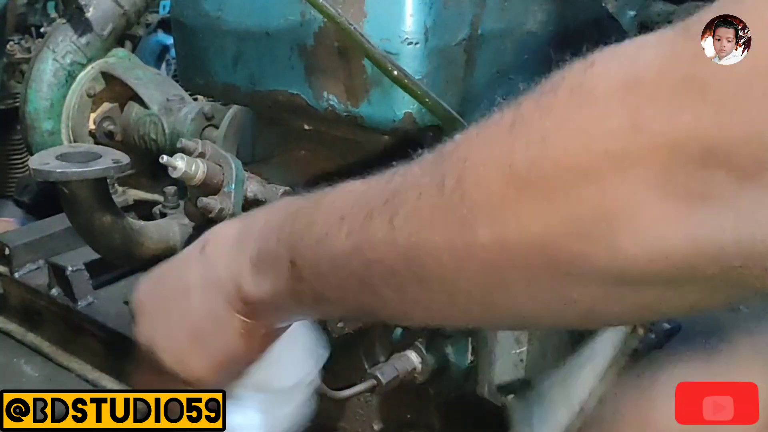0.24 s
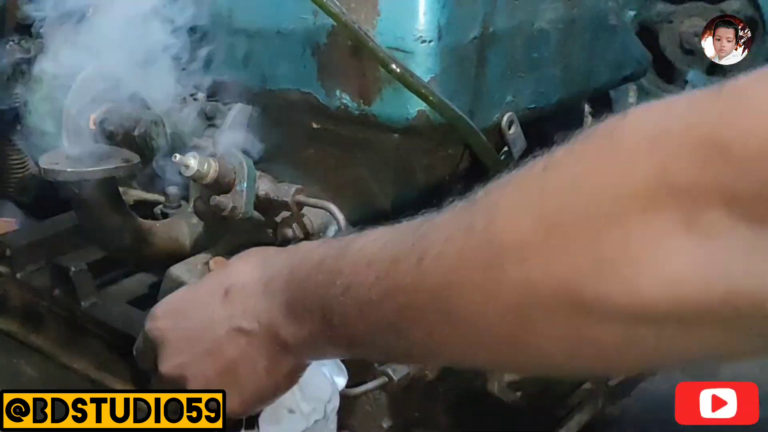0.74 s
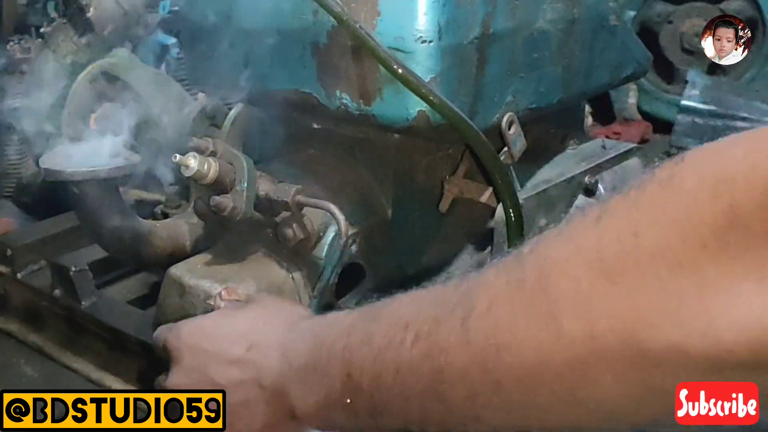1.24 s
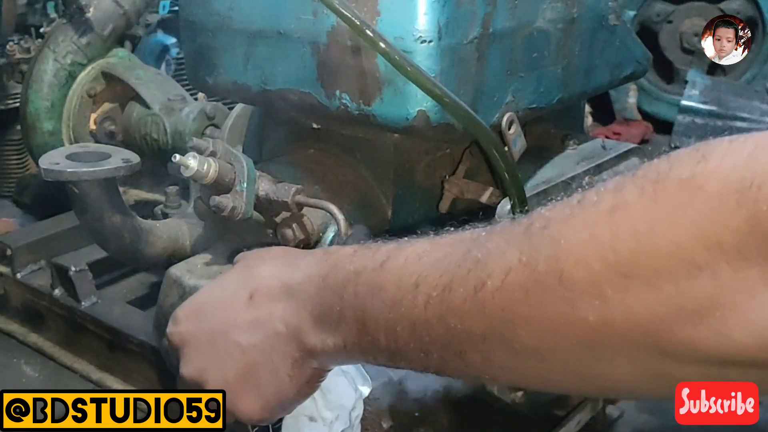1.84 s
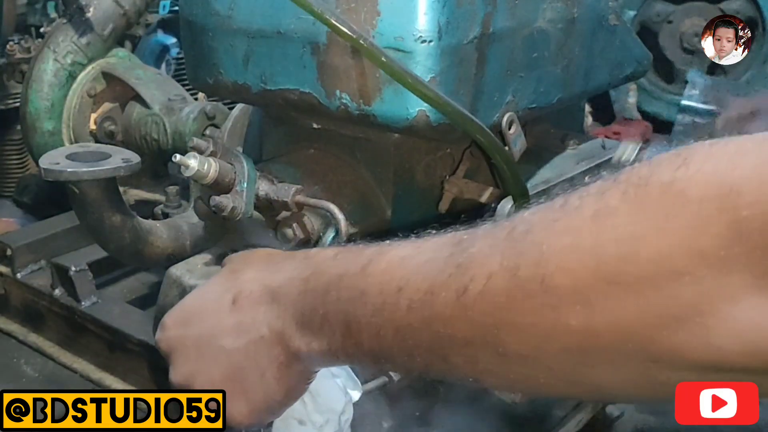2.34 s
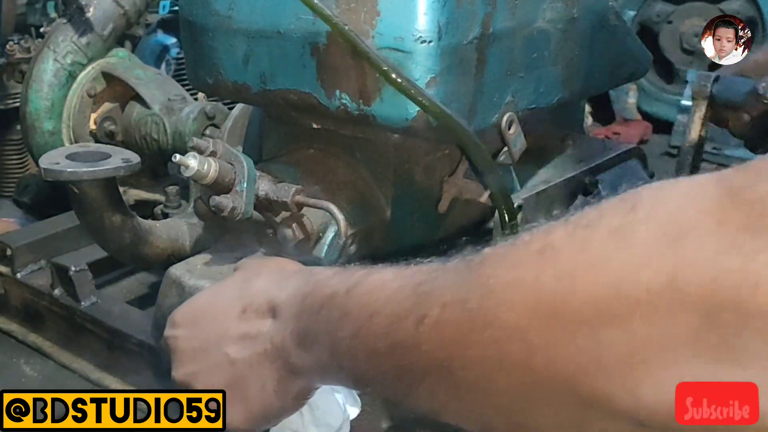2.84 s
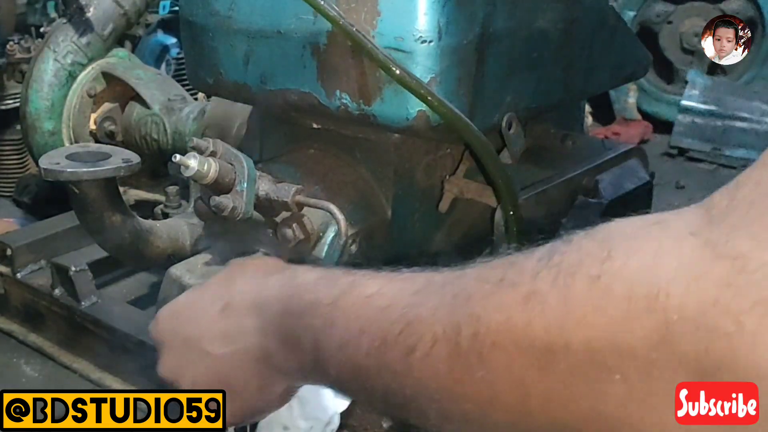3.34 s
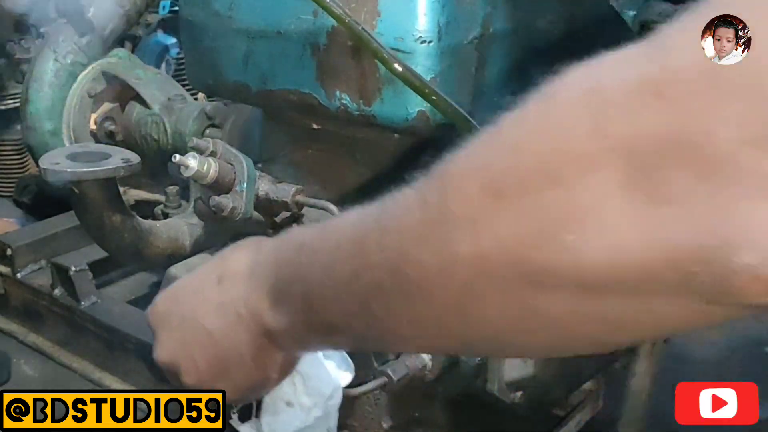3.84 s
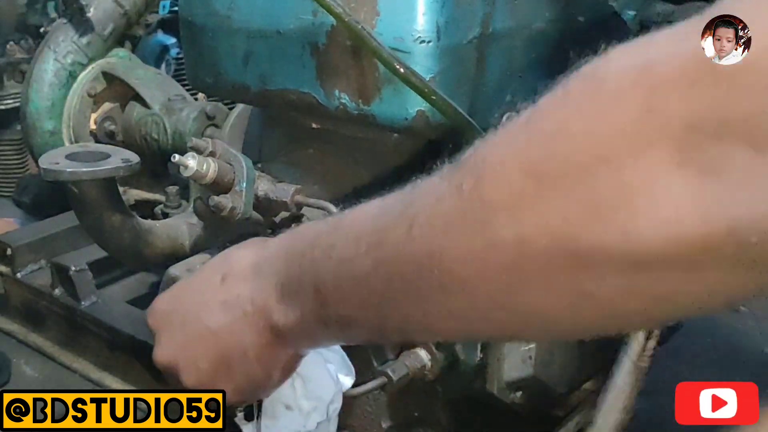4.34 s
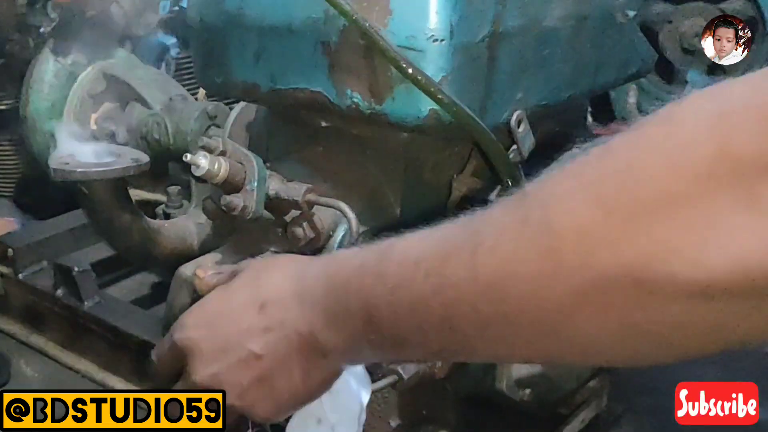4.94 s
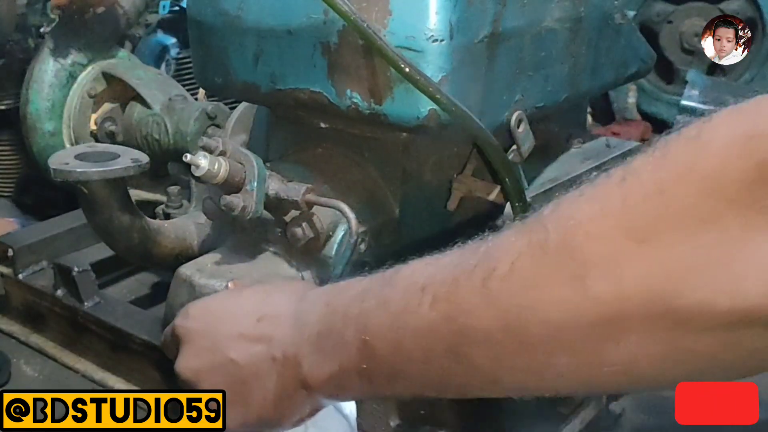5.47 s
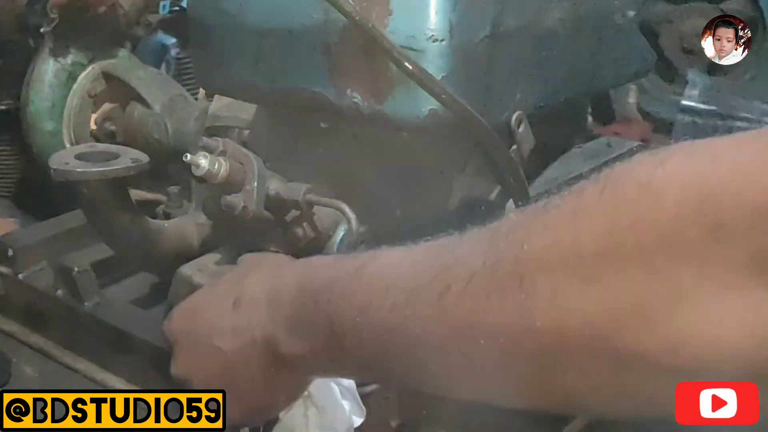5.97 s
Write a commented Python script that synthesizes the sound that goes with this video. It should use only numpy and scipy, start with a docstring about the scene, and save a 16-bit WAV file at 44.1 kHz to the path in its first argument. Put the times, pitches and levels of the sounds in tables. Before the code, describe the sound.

A small single-cylinder diesel is cranked over, clattering metal and a few deep exhaust thuds, slowing to loose clacks, then a second burst of attempts.

```python
"""Small diesel failing to start

A small single-cylinder diesel is turned over in a workshop and fires unevenly without catching.
Its metal parts are struck: noise bursts and ringing partials shaped by the resonances of each part.
Gears churn as filtered noise that swells and sinks; firings are steep pressure pulses with turbulence.
The exhaust pipe booms on at a gliding low pitch, the casing throbs, and a room response adds reflections."""
import sys
import numpy as np
from scipy import signal
from scipy.fft import rfft, irfft, next_fast_len
from scipy.io import wavfile
from scipy.ndimage import uniform_filter1d, minimum_filter1d

SR = 44100
rng = np.random.default_rng(int(sys.argv[2]) if len(sys.argv) > 2 else 0)


def to_wav(s):
    """Save 16-bit WAV."""
    ch = np.atleast_2d(s).T  # columns
    pcm = np.round(np.clip(ch, -1, 1) * 32767)  # PCM
    wavfile.write(sys.argv[1], SR, pcm.astype(np.int16))


N = 273861
PADDED = next_fast_len(N + SR // 2, True)
TIME, FREQS = np.arange(N) / SR, np.fft.rfftfreq(PADDED, 1 / SR)
CONTACT_S = .0026  # time in which a blow builds up
LEFT_RIGHT = np.array([[1], [-1]])


def from_db(db):
    """Decibel law: level to amplitude gain."""
    return 10 ** (np.asarray(db) / 20)


def rms_one(x):
    """Power normalisation: scale to unit mean square."""
    return x / np.sqrt(np.mean(x ** 2) + 1e-20)


def in_time(rows):
    """Linear interpolation: each column of a curve at every sample."""
    s, *columns = np.transpose(rows)
    return [np.interp(TIME, s, column) for column in columns]


def at_hz(points, hz):
    """Interpolation on a logarithmic frequency axis."""
    point_hz, values = np.array(points).T
    return np.interp(np.log(hz + 1), np.log(point_hz), values)


def drift(rate):
    """Band-limited chance: random knots, rate per second, joined by lines; rms 1."""
    knots = rng.standard_normal(N // 8)
    return rms_one(np.interp(TIME * rate, np.arange(len(knots)), knots))


def band(low_hz, high_hz, order=10):
    """Butterworth magnitude law: gain of a band-pass."""
    low_cut = 1 + (low_hz / (FREQS + 1)) ** (2 * order)
    high_cut = 1 + (FREQS / high_hz) ** (2 * order)
    return (low_cut * high_cut) ** -.5


# likeness of left and right, taken as at most 1: frequency_hz, correlation
LIKENESS = [(120, 0.54), (250, 1.9), (500, 0.63), (1000, 0.09), (2000, -0.09), (8000, 0.05)]
# balance of left against right: frequency_hz, left_over_right_db
BALANCE = [(150, 1), (350, 5), (700, 0.5), (1400, 1.5), (2500, 6), (4000, 1.5), (6000, -4), (9000, -10.5),
           (13000, -9.5)]


def contacts(colour, grit_db):
    """Random excitation: dense stereo noise of uneven strength and given spectrum; rms 1."""
    sizes = from_db(grit_db * np.clip(drift(900), -2, 2))
    mid, side = rfft(rng.standard_normal((2, N)) * sizes, PADDED)
    alike = np.clip(at_hz(LIKENESS, FREQS), -1, 1)
    pair = np.sqrt(1 + alike) * mid + np.sqrt(1 - alike) * side * LEFT_RIGHT
    pair = pair * from_db(LEFT_RIGHT * at_hz(BALANCE, FREQS) / 2)
    return rms_one(irfft(pair * colour, PADDED)[:, :N])


def resonance(modes, ring_db):
    """Modal superposition: power of the direct shock plus that of a part's resonances."""
    ring = sum(from_db(db) ** 2 / (1 + (2 * (FREQS - hz) / width) ** 2) for hz, width, db in modes)
    return np.sqrt(1 + from_db(ring_db) ** 2 * ring)


# ring of the iron casing: pitch_hz, width_hz, relative_db
CASING = [(319, 16.3, -1), (417.7, 25.5, -1.5), (527.5, 44.8, -1.5), (751, 35, 2), (854, 20, 0),
          (1087.6, 42.75, 2.5), (1368, 76.5, -1), (1840, 43.4, -3), (2154, 41, -1.5), (2489, 69, -1.5),
          (2757, 42, -3), (3186, 196, -2.5), (3486, 85, -1), (3792, 53, 0.5), (4110, 170, -1.5),
          (4790, 54, -4), (5190, 23.6, -4), (5750, 69, -3), (6350, 27, -6.5)]


def casing_response():
    """Structural resonance: the casing's modes stand above its direct shock."""
    return resonance(CASING, ring_db=8.0)


def grinding(colour, spacing_hz, shift_db, grit_db, count=3):
    """Moving contact: interleaved sets of resonances swell and fade independently; rms 1."""
    total = 0
    for k in range(count):
        part = np.maximum(np.cos(2 * np.pi * (FREQS / spacing_hz + k / count)), 0) ** .5
        total = total + contacts(colour * part, grit_db) * from_db(shift_db * drift(45))
    return rms_one(total)


def tooth_ticks(per_s, size_db, t60, count=30):
    """Impulse response: teeth catch at random and each tick rings at a few pitches; stereo, rms 1."""
    at = np.flatnonzero(rng.random(N) < per_s / SR)
    sizes = from_db(size_db * np.minimum(rng.exponential(1, len(at)), 2))
    out = np.zeros((2, N))
    for hz in np.geomspace(600, 5000, count):
        clicks = np.zeros((2, N))
        chosen = rng.random(len(at)) < 1 / 6
        clicks[:, at] = sizes * chosen * rng.standard_normal((2, len(at)))
        # two-pole resonator: pole radius and angle
        r, w = from_db(-60 / (t60 * SR)), 2 * np.pi * hz / SR
        poles = [1, -2 * r * np.cos(w), r * r]
        out += signal.lfilter([np.sin(w), 0, -np.sin(w)], poles, clicks + 1e-18) / w
    return rms_one(out)


# churn of gears and bearings, before the trims in churn(): time_s, low_db, high_db
CHURN = [(0.0, -33.5, -25.5), (0.17, -33, -28), (0.43, -41.5, -34.5), (0.6, -34.5, -39.5),
         (0.72, -43.5, -40), (1.07, -37.5, -49), (1.35, -46, -44.5), (1.56, -41.5, -50),
         (1.85, -45.5, -58.5), (2.3, -46.5, -51.5), (2.65, -48, -63), (3.18, -53, -57), (3.46, -38, -43),
         (3.74, -30, -30.5), (3.87, -37, -39), (3.96, -33, -30.5), (4.19, -31, -32), (4.53, -32, -26),
         (4.72, -41.5, -39.5), (4.98, -44, -48.5), (5.21, -42, -61), (5.48, -40, -46), (6.02, -46, -45.5),
         (6.21, -34, -45)]
# spectrum of the low grind: frequency_hz, relative_db
GEAR_LOW = [(140, 28), (200, 1), (320, 0), (480, 4.5), (600, -14.5), (780, -3), (930, -16.5), (1150, 6.5),
            (1400, -11)]
# spectrum of the high scrape: frequency_hz, relative_db
GEAR_HIGH = [(1400, 7), (2300, 5), (3100, -7.5), (5000, -1.5), (6500, -14), (8200, -37), (10500, -27),
             (15000, -52)]


def churn(iron, low_db, high_db, mesh_db, ticks_db):
    """Friction and meshing: gears grind unevenly and their teeth tick against the casing."""
    low, high = in_time(CHURN)
    low_colour = iron * from_db(at_hz(GEAR_LOW, FREQS)) * band(162.6, 1060)
    high_colour = iron * from_db(at_hz(GEAR_HIGH, FREQS)) * band(1200, 15500)
    grind = grinding(low_colour, spacing_hz=373.8, shift_db=3.5, grit_db=-1.0)
    scrape = grinding(high_colour, spacing_hz=837.0, shift_db=3.5, grit_db=1.5)
    tick_spectrum = rfft(tooth_ticks(per_s=220, size_db=5.5, t60=0.036), PADDED)
    ticks = rms_one(irfft(tick_spectrum * iron * band(700, 2600, order=1), PADDED)[:, :N])
    mesh = rms_one(from_db(mesh_db * drift(140)))
    rubbing = (from_db(low + low_db) * grind + from_db(high + high_db) * scrape) * mesh
    return rubbing + from_db(high + ticks_db) * ticks


# pace of the steady throb: crest_s, throbs_since_start
THROB_CRESTS = [(-.05, 0), (1.09, 16), (1.461, 21), (2.129, 30), (2.969, 42), (3.428, 48), (5.155, 70),
                (5.541, 75), (5.806, 78), (6.23, 83)]
# casing's two lowest resonances, before the swell: time_s, lower_db, lower_pitch_hz, upper_db
THROB = [(0, -28, 125, -47), (1.2, -37, 128.4, -49), (1.9, -35, 131.3, -45.5), (2.5, -40.5, 134, -41.5),
         (2.9, -42, 130.6, -56), (3.2, -37.5, 129.3, -51), (5.24, -34, 127, -56), (6.21, -32.5, 128, -47)]
# hard strokes of the piston, before the trim heave_db: peak_s, level_db
HEAVES = [(0.02, -23.5), (0.479, -20), (0.595, -27), (0.703, -36), (0.968, -23.5), (3.891, -23),
          (4.047, -19), (4.172, -20.5), (4.265, -23), (4.385, -25), (4.521, -24), (4.627, -27),
          (4.77, -22.5)]


def throbs(upper_hz, width_s, heave_db, scatter, uneven_db, sharpness):
    """Forced vibration: two casing resonances swell and sink; the lower also heaves on hard strokes."""
    turns, = in_time(THROB_CRESTS)
    lower_db, lower_hz, upper_db = in_time(THROB)
    swell = from_db(uneven_db * drift(19)) * np.abs(np.cos(np.pi * turns)) ** sharpness
    heave_power = np.zeros(N)
    for s, peak_db in HEAVES:
        hump = np.maximum(1 - ((TIME - s) / width_s) ** 2, 0) ** 2
        heave_power += (from_db(peak_db + heave_db) * hump) ** 2

    def tone(hz):
        """Frequency modulation: a sine of rms 1 whose pitch wanders."""
        return np.sqrt(2) * np.sin(2 * np.pi * np.cumsum(hz * (1 + scatter * drift(25))) / SR)

    lower_level = np.sqrt((from_db(lower_db) * swell) ** 2 + heave_power)
    return lower_level * tone(lower_hz) + from_db(upper_db) * swell * tone(upper_hz)


# pumping of the pipe by the piston, before heat and the trim pumped_db: time_s, pitch_hz, level_db
BOOM = [(0, 80, -35), (.2, 88.4, -29.5), (.35, 90.4, -40.5), (.6, 70.3, -30.5), (.92, 73.1, -31.5),
        (1.1, 65.2, -57), (1.9, 57.9, -46), (2.3, 62, -54.5), (3.55, 60.4, -52.5), (3.9, 66.2, -38),
        (4.15, 66.3, -34), (4.4, 95.4, -31.5), (4.6, 92, -33), (4.82, 80, -31), (4.98, 72.1, -32),
        (5.1, 56.5, -29), (5.3, 59.9, -34), (5.8, 59.3, -43.5), (6.21, 73.6, -37.5)]
# exhaust puffs and the gas rushing from the pipe mouth: start_s, peak_db, pitch_hz, chuff_db
FIRINGS = [(0.4043, -6, 106, -23.5), (0.417, -15.5, 141, -35), (0.6374, -4, 110, -23),
           (0.674, -8.5, 130, -41), (0.722, -23, 190, -30.5), (0.874, -5.5, 112, -41),
           (0.906, -8.5, 133, -28), (1.3428, -15, 185, -31), (4.7309, -2, 112, -22.5),
           (4.742, -12, 151, -34), (4.76, -14, 110, -52), (5.028, -3.5, 122, -30.5),
           (5.113, -13, 157.1, -49)]
# a puff of FULL_PUFF_DB or more sets the pipe booming fully; the boom then dies away
FULL_PUFF_DB, BOOM_FALL_DB_PER_S = -5, 41
# hot gas raises the pitch by up to this share after a firing, and cools with this time constant
HOT_LIFT, COOLING_S = 0.357, 0.0502


def boom(fired_db, growth, pumped_db, waver, unrest):
    """Pipe resonance: gas swings as the piston pumps it and after firings, sinking in pitch as it cools."""
    hz, pumping_db = in_time(BOOM)
    level, heat = from_db(pumped_db + pumping_db), np.zeros(N)
    for s, db, *_ in FIRINGS:
        age = np.maximum(TIME - s, 0)
        kick_db = fired_db + growth * min(db - FULL_PUFF_DB, 0)
        fired_level = np.minimum(age * hz, 1) * from_db(kick_db - BOOM_FALL_DB_PER_S * age)
        level = np.maximum(level, fired_level)
        heat = np.maximum(heat, (age > 0) * from_db(kick_db - fired_db) * np.exp(-age / COOLING_S))
    phase = 2 * np.pi * np.cumsum(hz * (1 + HOT_LIFT * heat + waver * drift(45))) / SR
    # eddies unsettle a gentle swing more than a strong one
    eddies = unrest / (1 + level / from_db(-22))
    swing = (1 + eddies * drift(50)) * np.sin(phase) + eddies * drift(50) * np.cos(phase)
    return level * swing / np.sqrt(.5 + eddies ** 2)


# spectrum of the steady background: frequency_hz, relative_db
HISS = [(200, -3.5), (330, -8), (485, 1), (570, -6), (700, -6), (880, -10), (980, -9.5), (1150, -16.5),
        (2100, -7.5), (3000, -12.5), (4800, -16.5), (6400, -28), (8200, -52), (11000, -46.5), (15000, -51)]


def hiss(db, waver_db):
    """Broadband noise: the workshop's background wavers slightly."""
    colour = from_db(at_hz(HISS, FREQS)) * band(110, 16000, order=4)
    level = from_db(db + waver_db * drift(8))
    return level * grinding(colour, spacing_hz=528, shift_db=1.8, grit_db=1.5)


def rebounds(per_s, t60):
    """Repeated impact: level of a loose part that touches again at uneven moments; rms 1."""
    touches = (rng.random(N) < per_s / SR) * rng.random(N) * 2
    # power falls by 60 dB in t60
    power = signal.lfilter([1], [1, -from_db(-120 / (t60 * SR))], touches)
    return rms_one(np.sqrt(.3 + power))


def partials(share_below, age, count):
    """Modal excitation: a blow picks its own partials, most often where the part rings best; stereo."""
    places = .96 * (np.arange(count) + rng.random(count)) / count
    hz = np.interp(places, share_below, FREQS)
    gains = from_db(LEFT_RIGHT * at_hz(BALANCE, hz) / 2 + rng.normal(0, 3, count))
    gains = gains / np.sqrt(np.sum(gains ** 2) / 4)
    gains = gains * np.exp(2j * np.pi * rng.random((2, count)))
    turns = 2 * np.pi * hz[:, None] * age
    return gains.real @ np.cos(turns) + gains.imag @ np.sin(turns)


# tilt of the four knock bands with contact hardness: change_db per dB of brightness
HARDNESS = [-0.44, 0.42, 1.39, 2]
# blows above this level die sooner; their decay time halves over this many dB
FIRM_BLOW_DB, DECAY_HALVING_DB = -23, 16


def blows(rows, spectrum_db, t60, pan_db):
    """Contact hardness: brightness tilts a part's spectrum, and firm blows decay faster than light ones."""
    hits = []
    for s, rattle, db, bright in rows:
        blow_t60 = t60 * .5 ** (max(db - FIRM_BLOW_DB, 0) / DECAY_HALVING_DB)
        levels = db + np.array(spectrum_db) + bright * np.array(HARDNESS)
        hits.append((s, max(rattle, 0), blow_t60, *levels, pan_db))
    return hits


# bands of clunk, clank, clink and tick: low_hz, high_hz
KNOCK_BANDS = [(250, 1400), (1400, 3200), (3200, 7300), (9200, 15500)]
# spectrum of a metal contact: frequency_hz, relative_db
CONTACT = [(250, -1.5), (420, -4), (600, -4.5), (780, -1.5), (930, -6), (1150, -1.5), (1600, 0),
           (2300, 2.5), (3000, -3), (5000, 0.5), (6300, -7), (7500, -18.5), (10000, -24), (13000, -24.5),
           (16000, -28)]
# a blow lands cleanly and its chatter sets in within this time
SETTLE_S = .014


def knocks(hits, part, band_db, ring_db, crack_db, crack_s, chatter_db, clash_share, ring_t60, count):
    """Impact and free decay: a crack and chattering clash die quickly and leave ringing partials."""
    body = part * from_db(at_hz(CONTACT, FREQS))
    colours = [body * band(*edges, order=14) for edges in KNOCK_BANDS]
    shares = [np.cumsum(c ** 2) / np.sum(c ** 2) for c in colours]
    power, rings = np.zeros((len(colours), 2, N)), np.zeros((2, N))
    chatter = rms_one(from_db(chatter_db * drift(300)) * rebounds(per_s=230, t60=0.1))
    for s, rattle, t60, *levels, pan in hits:
        span = slice(max(0, int((s - CONTACT_S) * SR)), int((s + .2) * SR))
        age = TIME[span] - s
        rise = np.clip(age / CONTACT_S + .5, 0, 1)
        since = np.maximum(age - rattle, 0)  # decay begins when the rattle ends
        gains = from_db(levels)[:, None, None] * from_db(LEFT_RIGHT * pan / 2)
        clash = rise * from_db(-60 * since / (t60 * clash_share))
        clash = clash * (1 + (chatter[span] - 1) * np.clip(age / SETTLE_S, 0, 1) ** 2)
        crack = 1 + from_db(crack_db) * np.exp(-np.abs(age) / crack_s)
        power[:, :, span] += (gains * clash * crack) ** 2
        for k, share_below in enumerate(shares):
            ring = rise * from_db(-60 * since / np.hypot(t60, ring_t60[k]) + ring_db[k])
            rings[:, span] += gains[k] * ring * partials(share_below, age, count=count)
    clashes = 0
    for band_power, colour, db in zip(power, colours, band_db):
        clashes = clashes + from_db(db) * np.sqrt(band_power) * contacts(colour, grit_db=1.0)
    return rings + clashes


def ringing(strikes, modes, width_hz):
    """Damped modes: each strike rings; random phase broadens the modes and makes the tail ragged."""
    out = np.zeros((2, N))
    for s, db in strikes:
        span = slice(int(s * SR), int((s + .4) * SR))
        age = np.maximum(TIME[span] - s, 0)
        for hz, mode_db, t60 in modes:
            steps = rng.standard_normal((2, 2, len(age)))
            wander = np.cumsum(steps, axis=-1) * np.sqrt(2 * np.pi * abs(width_hz) / SR)
            start = rng.random((2, 2, 1))
            pair = np.sin(2 * np.pi * (hz * age + start) + wander).sum(axis=1)
            level = from_db(db + mode_db - 60 * age / t60) * np.minimum(age / CONTACT_S, 1)
            out[:, span] += level * pair
    return out


# In every blow table below, level_db is the level before the part's spectrum and band trims.
# heavy knocks of the piston and crank: start_s, rattle_s, level_db, brightness_db
KNOCKS = [(0.01, 0.0087, -17, -1), (0.205, 0.0064, -16, -1.5), (0.402, 0.0066, -37, -2),
          (0.616, 0.01, -30.5, 1.5), (0.851, 0.021, -32, -0.5), (3.287, 0.0012, -44.5, 5),
          (3.649, 0.0051, -26, 1), (3.748, 0.0079, -17.5, -1), (4.053, 0.014, -17.5, 1.5),
          (4.301, 0.012, -20, 0), (4.519, 0.007, -18, -0.5), (4.724, 0.0032, -37.5, -21.5)]
# lighter taps of the valve gear: start_s, rattle_s, level_db, brightness_db
TAPS = [(0.075, 0.0063, -20.5, 3), (0.119, 0.003, -25, -1), (0.17, 0.012, -37, 6.5),
        (0.259, 0.012, -20.5, 1.5), (0.278, 0.023, -23.5, 0), (0.472, 0.0028, -27, -1.5),
        (0.942, 0.006, -37, -1), (3.701, .004, -36, -12), (3.917, 0.0086, -19.5, -3),
        (3.933, 0.0032, -27, -17), (3.965, .004, -41, -14), (3.999, 0.0024, -19, 4),
        (4.188, 0.0096, -21, -5), (4.242, 0.0012, -20.5, 2.5), (4.372, 0.0034, -14.5, -0.5),
        (4.414, 0.0035, -18, 0), (4.464, 0.01, -30, 4), (4.565, 0.002, -19, -4), (4.58, 0.011, -21, -0.5),
        (4.615, 0.011, -21.5, -2.5), (4.778, .003, -49, 8.5)]
# clacks of loose gears taking up their play: start_s, rattle_s, level_db, brightness_db
CLACKS = [(0.996, 0.02, -42, -1), (1.04, 0.007, -26.5, 1), (1.475, 0.013, -26.5, 8),
          (1.486, 0.012, -21, -9), (1.583, 0.00024, -28.5, 6), (1.631, 0.013, -32, 0), (2.091, 0, -26, 3),
          (2.157, 0.01, -19, -0.5), (2.333, 0.06, -37, 4.5), (2.379, 0.0011, -14, 6.5),
          (2.393, 0.028, -18, 5), (2.511, 0, -19, 7.5), (2.525, 0.019, -28.5, 5.5), (3.529, 0.01, -27, 2.5),
          (3.85, 0, -23, 4), (4.028, 0.01, -19, -6), (4.143, 0, -20, 5.5), (4.275, 0.033, -22, 1.5),
          (4.842, 0.0055, -27, -2), (5.005, 0.00052, -42.5, 17), (5.232, 0.012, -24.5, -5.5),
          (5.723, 0.0029, -19.5, 3.5), (5.732, 0, -36, 1), (5.854, 0.011, -26, 3.5),
          (5.863, 0.0052, -28, 5), (6.061, 0.000051, -19, 9.5), (6.085, 0.0084, -27, 2),
          (6.142, 0.0043, -12, -1), (6.149, 0.0049, -27, -16)]


def casing_blows(iron):
    """Structure-borne impact: piston, valve gear and loose gears all strike the one iron casing."""
    hits = (blows(KNOCKS, spectrum_db=[0.5, 2.0, 1.5, -28.0], t60=0.056, pan_db=-3.0)
            + blows(TAPS, spectrum_db=[-7.0, 1.5, -3, -34.5], t60=0.096, pan_db=-1.5)
            + blows(CLACKS, spectrum_db=[-9.5, -2.0, -16, -61], t60=0.12, pan_db=-0.4))
    return knocks(hits, iron, band_db=[-2.9, -4.0, -0.67, -5.5], ring_db=[-3.5, -7.5, -9.0, -1.0],
                  crack_db=-12.0, crack_s=0.0013, chatter_db=-0.3, clash_share=0.78,
                  ring_t60=[0.087, 0.025, 0.041, .02], count=13)


# sharp pings of the cylinder head: start_s, rattle_s, level_db, brightness_db
PINGS = [(0.3145, 0.0047, -16.5, 1), (0.826, 0.007, -32.5, -1.5), (2.392, 0.0005, -9.5, -13),
         (4.6375, 0.003, -16, 2.5)]
# ring of the cylinder head: pitch_hz, width_hz, relative_db
HEAD = [(780, 46, -3), (1490, 130, -4), (1850, 90, -1), (1936, 110, -5.5), (3040, 190, 3), (3413, 180, 7.5),
        (4080, 180, 2.5), (4830, 170, 3.5), (5570, 140, 1), (6580, 130, -2)]


def head_pings():
    """Impact response: sharp blows sound the broad modes of the cylinder head."""
    hits = blows(PINGS, spectrum_db=[-22.0, 5.5, 5.0, -23.5], t60=0.038, pan_db=-2.8)
    return knocks(hits, resonance(HEAD, ring_db=9.5),
                  band_db=[-8.0, -4.1, 0.0, -4.5], ring_db=[-5.5, -11.5, -30.0, 0.0],
                  crack_db=-16.0, crack_s=0.0012, chatter_db=11.5, clash_share=1.0,
                  ring_t60=[0.14, 0.083, 0.052, 0.026], count=40)


# plays the FIRINGS table given above boom()
def firings(lead_cycles, tail_cycles, gas_db, gas_t60, chuff_t60):
    """Pressure pulse and turbulence: a steep swing, then noise in the pipe and a chuff at its mouth."""
    puffs, rush, chuff = np.zeros((3, N))
    for s, db, hz, chuff_db in FIRINGS:
        span = slice(int((s - .03) * SR), int((s + .3) * SR))
        age = TIME[span] - s
        cycles, since = age * hz, np.maximum(age, 0)
        # the front is steeper than the back
        swing = np.cos(2 * np.pi * cycles * np.where(age < 0, 1.2, .95))
        envelope = np.exp(-(cycles / np.where(age < 0, lead_cycles, tail_cycles)) ** 2)
        puffs[span] += from_db(db) * swing * envelope
        rush[span] += from_db(db) * np.clip(cycles, 0, 1) * from_db(-60 * since / gas_t60)
        chuff[span] += np.clip(2 * cycles + 1.5, 0, 1) * from_db(chuff_db - 60 * since / chuff_t60)
    in_pipe = rms_one(contacts(band(99, 190, order=3), grit_db=-6.0).sum(axis=0))
    at_mouth = contacts(band(170, 386, order=4), grit_db=0.5)
    return puffs + from_db(gas_db) * rush * in_pipe + chuff * at_mouth


# short, dull rasps of gears rubbing: start_s, rattle_s, level_db, brightness_db
RASPS = [(0.427, 0.011, -34.5, 11), (0.587, 0.015, -37.5, 8.5), (1.326, 0.0056, -44, -11),
         (1.424, 0.024, -34, -10), (1.592, 0.02, -31, 5.5), (1.725, 0.023, -25.5, 3.5),
         (1.763, 0.013, -27, -2.5), (2.546, 0.019, -30.5, -5.5), (3.94, 0.041, -31, -5),
         (4.427, 0.0099, -30, -2), (4.686, .022, -29.5, -3.5), (5.098, 0.0044, -47, -12),
         (5.176, 0.0093, -34.5, -11), (5.397, 0.021, -25.5, 1.5), (5.428, 0.0047, -33.5, 11),
         (5.51, 0.033, -33.5, -7.5), (5.591, 0.016, -37.5, -9), (5.653, 0.0074, -33.5, -1),
         (5.735, 0.0083, -30, 2), (5.866, 0.0072, -31.5, 2.5), (6.15, 0.0093, -22.5, 0.5)]
# ring of the gears: pitch_hz, width_hz, relative_db
GEARS = [(296, 40, 0.5), (515, 53, 1), (771, 43, 2), (1105, 83, 4), (1487, 110, 0), (1976, 155, 3),
         (2162, 124, 1.5), (2610, 100, -1), (2660, 83, 1)]


def gear_rasps():
    """Friction: gears rub against each other and sound their own modes."""
    hits = blows(RASPS, spectrum_db=[-2.5, 1, -17.5, -68], t60=0.091, pan_db=0.5)
    return knocks(hits, resonance(GEARS, ring_db=11.0),
                  band_db=[-1.7, 0.1, -5.5, -1.0], ring_db=[-3.0, -10.5, 0.0, -10.0],
                  crack_db=-14.0, crack_s=0.0014, chatter_db=-1.0, clash_share=0.95,
                  ring_t60=[0.075, 0.063, 0.04, .02], count=13)


# the valve spring is jolted and rattles on its seat: start_s, rattle_s, level_db, brightness_db
SPRING_JOLTS = [(0.6662, 0.0055, -14.5, 0.5), (0.689, 0.048, -35.5, 0.5)]
# modes of the spring: pitch_hz, relative_db, t60_s
SPRING = [(1050, -8.5, .05), (2213, 1, 0.15), (2670, 1, 0.14), (3050, -7.5, .2), (3400, -7, 0.13),
          (3780, -1.5, 0.17), (4630, -0.5, 0.28), (4560, -1.5, 0.23), (4710, -8.5, 0.15), (5870, -12, .18),
          (6330, -10, .12)]


def spring(ring_db):
    """Free vibration: the jolt clashes in the spring's own modes, which then ring on."""
    hits = blows(SPRING_JOLTS, spectrum_db=[-10.5, 2.5, 1.0, -22], t60=0.065, pan_db=-1.5)
    part = resonance([(hz, 100, db) for hz, db, _ in SPRING], ring_db=14.5)
    clash = knocks(hits, part, band_db=[-1.3, -1.4, -1.5, -1.7], ring_db=[-9.0, -31.0, -23.0, -3.0],
                   crack_db=-18.0, crack_s=0.0012, chatter_db=-1.5, clash_share=0.91,
                   ring_t60=[0.1, 0.15, 0.1, 0.04], count=30)
    strikes = [(s, db + ring_db) for s, _, db, _ in SPRING_JOLTS]
    return clash + ringing(strikes, SPRING, width_hz=35)


# a valve snaps shut just before a weak puff: start_s, rattle_s, level_db, brightness_db
VALVE_SNAPS = [(1.324, 0.0077, -31, 1.5), (5.096, 0.005, -32, 2)]
# ring of the valve: pitch_hz, width_hz, relative_db
VALVE = [(1280, 35, -0.5), (3570, 160, 1), (4140, 37, -4), (4350, 103, -6), (5300, 100, -8.5),
         (6460, 97, -13), (6750, 37, -16)]


def valve_snaps():
    """Impact response: the valve lands on its seat and sounds its modes."""
    hits = blows(VALVE_SNAPS, spectrum_db=[4, -1, 2.5, -21.5], t60=0.05, pan_db=-2.0)
    return knocks(hits, resonance(VALVE, ring_db=17.0),
                  band_db=[-1.3, -1.2, -0.62, -1.4], ring_db=[-15.0, -16.0, -16.5, -4.0],
                  crack_db=-14.0, crack_s=0.0012, chatter_db=-2.5, clash_share=0.71,
                  ring_t60=[0.07, 0.06, 0.043, 0.04], count=24)


# clangs of the rocker and valve spring: start_s, rattle_s, level_db, brightness_db
CLANGS = [(1.65, 0.024, -24, -3), (3.741, 0.018, -21.5, 1), (4.97, 0.0037, -32, 0.5),
          (5.334, 0.001, -20, 1), (5.347, 0.0093, -29, -10.5), (5.359, 0.012, -22, 0),
          (5.384, 0.0024, -23.5, -1)]
# ring of the valve gear: pitch_hz, width_hz, relative_db
ROCKER = [(299.5, 22, 6.5), (847, 24, 8), (1077, 36, 11.5), (1190, 51, 2.5), (2220, 47, -1),
          (2506, 67, 5.5), (3975, 110, 2), (4740, 99, 4), (5060, 44, 1), (5350, 58, 7.5), (5520, 36, 7.5),
          (6070, 31, 6), (6300, 45, 10), (7250, 220, 9.5)]


def rocker_clangs(ring_db, stretch, rattle_share):
    """Bandwidth and decay: a clang leaves the valve gear ringing, its narrow modes longest."""
    hits = blows(CLANGS, spectrum_db=[-7.0, -2.0, 2.0, -29.5], t60=0.16, pan_db=-0.5)
    clash = knocks(hits, resonance(ROCKER, ring_db=10.0),
                   band_db=[0.5, -4.5, -0.5, -4.0], ring_db=[-8.0, -12.0, -25.0, 2.0],
                   crack_db=-15.0, crack_s=0.0019, chatter_db=4.0, clash_share=0.58,
                   ring_t60=[0.084, 0.046, 0.071, .02], count=24)
    modes = [(hz, db, stretch / width) for hz, width, db in ROCKER]
    # the ring starts part of the way through the rattle
    strikes = [(s + rattle_share * max(rattle, 0), db + ring_db) for s, rattle, db, _ in CLANGS]
    return clash + ringing(strikes, modes, width_hz=7.3)


# strikes on a steel pin: start_s, level_db
PIN_STRIKES = [(2.379, -33), (2.393, -41)]
# modes of the pin: pitch_hz, relative_db, t60_s
PIN = [(2190, -4, .17), (2370, -5, 0.17), (4740, -1, .14), (6170, 1, 0.096)]


def pin():
    """Free vibration: a struck steel pin rings in its modes."""
    return ringing(PIN_STRIKES, PIN, width_hz=6.7)


# workshop reverberation: frequency_hz, t60_s
ROOM_T60 = [(100, 0.17), (1000, 0.3), (4000, 0.26), (10000, 0.16)]


def workshop(x, wet_db):
    """Diffuse reverberation: convolution with noise that decays at a different rate in each band."""
    age, response = TIME[:SR // 2], 0
    for low, high in [(60, 400), (400, 2500), (2500, 7500), (7500, 16000)]:
        bandpass = signal.butter(2, [low, high], "band", fs=SR, output="sos")
        noise = signal.sosfilt(bandpass, rng.standard_normal((2, len(age))))
        t60 = at_hz(ROOM_T60, np.sqrt(low * high))
        response = response + noise * from_db(-60 * age / t60)
    response = response * np.clip(age / 0.0039 - .5, 0, 1)  # short gap before the reflections
    response = response / np.sqrt(np.sum(response ** 2) / 2)
    return from_db(wet_db) * irfft(rfft(x, PADDED) * rfft(response, PADDED), PADDED)[:, :N]


def scene():
    """Superposition: the engine close by, with the room around it."""
    iron = casing_response()
    gears = churn(iron, low_db=1.0, high_db=1.0, mesh_db=2.0, ticks_db=-6.0)
    bass = throbs(upper_hz=165.7, width_s=0.053, heave_db=-0.3, scatter=0.0443,
                  uneven_db=1.5, sharpness=1.55)
    bass = bass + boom(fired_db=-17.0, growth=2.06, pumped_db=4.0, waver=0.1112, unrest=1.74)
    background = hiss(db=-48.0, waver_db=0.6)
    metal = casing_blows(iron) + head_pings() + gear_rasps() + spring(ring_db=-13.5)
    metal += valve_snaps() + rocker_clangs(ring_db=-19.5, stretch=5.5, rattle_share=.4) + pin()
    exhaust = firings(lead_cycles=0.54, tail_cycles=0.66, gas_db=-20.0, gas_t60=0.13, chuff_t60=0.15)
    room = workshop(metal, wet_db=-11.0) + workshop(exhaust, wet_db=-16.5)
    return metal + gears + exhaust + room + bass + background


def record(dry):
    """Filtering and limiting: the deepest bass is thinned, peaks are held and the top is cut."""
    dry = signal.sosfilt(signal.butter(1, 12, "high", fs=SR, output="sos"), dry)
    allowed = np.minimum(1, .93 / (np.abs(dry).max(axis=0) + 1e-9))
    gain = uniform_filter1d(minimum_filter1d(allowed, size=181), size=181)
    top_cut = signal.ellip(10, .2, 80, 15800, fs=SR, output="sos")
    return signal.sosfilt(top_cut, dry * gain)


dry = scene()
out = record(dry)
to_wav(out)
```